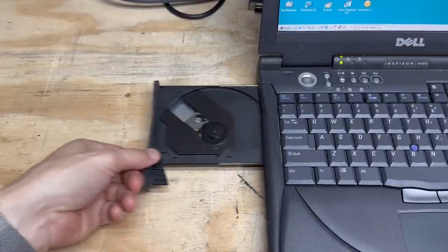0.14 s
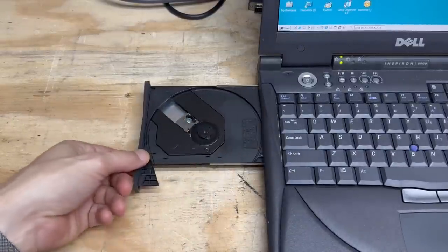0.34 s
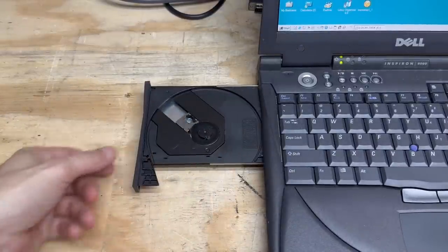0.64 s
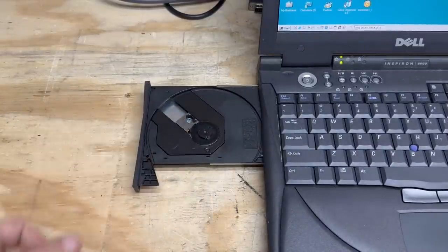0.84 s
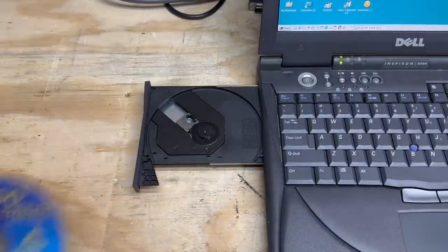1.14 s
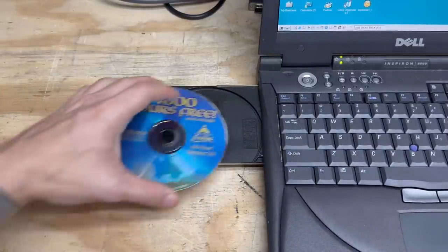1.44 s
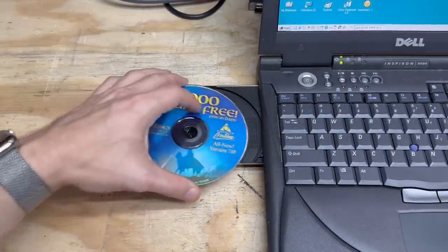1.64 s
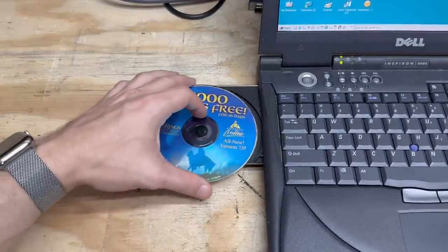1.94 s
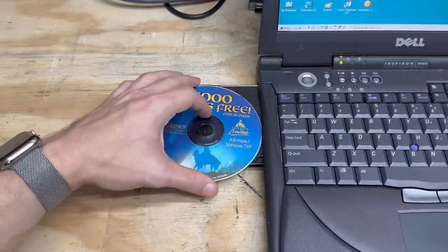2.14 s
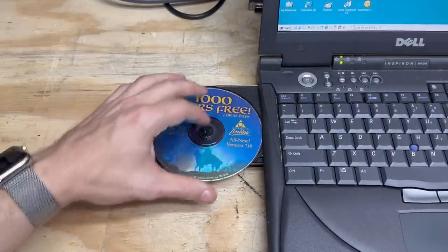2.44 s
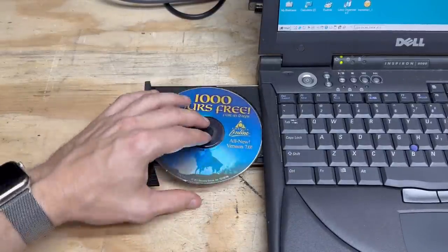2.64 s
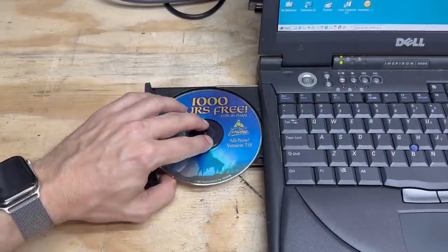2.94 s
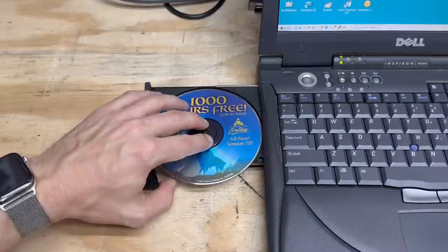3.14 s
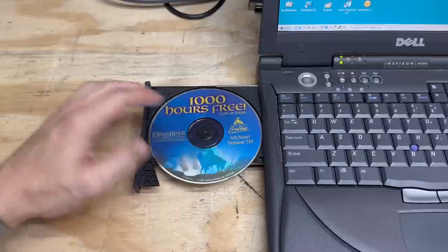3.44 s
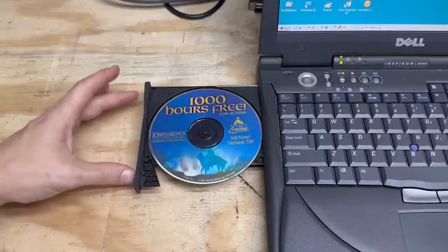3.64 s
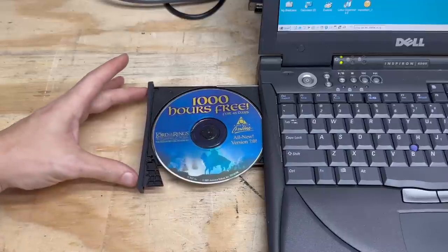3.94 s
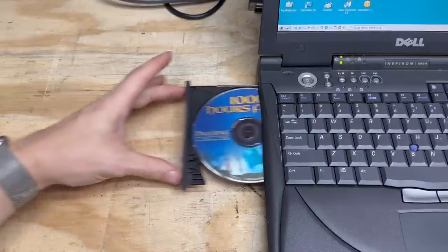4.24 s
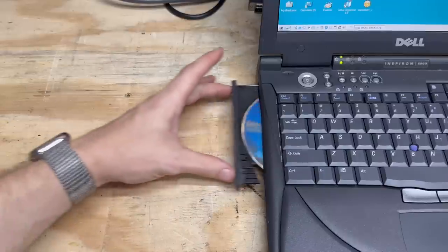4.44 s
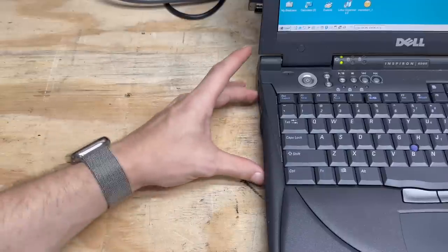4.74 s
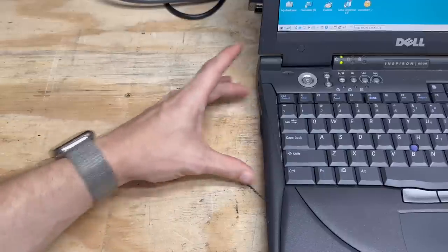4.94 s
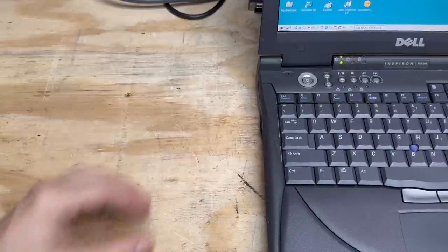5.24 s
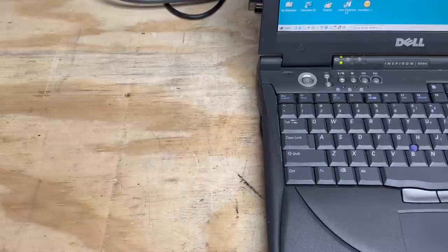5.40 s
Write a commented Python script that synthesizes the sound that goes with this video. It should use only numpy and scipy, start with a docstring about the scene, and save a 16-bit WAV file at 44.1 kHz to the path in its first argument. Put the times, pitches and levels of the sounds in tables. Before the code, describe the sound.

Close to the microphone in a small room, a laptop disc tray scrapes out and clacks against its stop. After soft handling thumps, a loose disc ticks lightly on the hub, then snaps down hard with a short ring. A pause follows, then the tray slides in with a rising hiss, knocks and latches over a faint fan hum.

```python
"""A laptop hums with fan and hard-disk tones over moving air, and hand moves swell a low rumble at the close mic.
Hissing rails carry the disc tray out to its stop: blows ring its modes, with soft thumps, rattle and brushing skin.
A whine sets in and settles, light taps ring the loose disc as it is fidgeted onto the hub, and a loud snap
presses it home. Then the tray slides back along its rails and latches. A small room, made of decaying noise,
answers the handling sounds throughout."""
import sys
import numpy as np
from scipy import signal
from scipy.fft import rfft, irfft, next_fast_len
from scipy.io import wavfile

SR = 44100
rng = np.random.default_rng(int(sys.argv[2]) if len(sys.argv) > 2 else 0)


def store_wav(level_fs):
    """Save 16-bit WAV to argv[1]."""
    pcm = np.round(np.clip(np.atleast_2d(level_fs), -1, 1) * 32767)
    wavfile.write(sys.argv[1], SR, pcm.T.astype(np.int16))


N = 245637
T = np.arange(N) / SR


def undb(db):
    """Decibels to gain."""
    return 10 ** (np.asarray(db) / 20)


def unit(x):
    """Scale to rms 1."""
    return x / np.sqrt(np.mean(x ** 2) + 1e-20)


def lookup(points, hz):
    """Read (f/Hz, value) points on a log-frequency axis."""
    f, value = np.transpose(points)
    return np.interp(np.log(np.maximum(hz, 1)), np.log(f), value)


def colour(x, points):
    """Filter by a (f/Hz, level/dB) spectrum."""
    size = next_fast_len(len(x))
    gain = undb(lookup(points, np.fft.rfftfreq(size, 1 / SR)))
    return irfft(rfft(x, size) * gain, size)[:len(x)]


def band(x, lo_hz, hi_hz, order=2):
    """Causal band-pass."""
    sos = signal.butter(order, [lo_hz, min(hi_hz, SR / 2 - 1)], "band", fs=SR, output="sos")
    return signal.sosfilt(sos, x)


def fade(t, t60):
    """Exponential decay, down 60 dB after t60 seconds."""
    return np.exp(-np.log(1000) * t / t60)


def walk(rate):
    """Random drift with a spread near 1, taking a new direction rate times a second."""
    knots = rng.standard_normal(32768)
    return np.interp(T * rate, np.arange(len(knots)), knots)


def gate(start, end, attack, release):
    """Level 1 from start to end, with an exponential rise before and fall after."""
    return np.exp(np.minimum(T - start, 0) / attack - np.maximum(T - end, 0) / release)


def swell(s, length):
    """A bell-shaped rise and fall around a time."""
    return np.exp(-(2 * (T - s) / length) ** 2)


def add(track, s, sound):
    """Mix a sound in at a time."""
    start = max(int(s * SR), 0)
    track[start:start + len(sound)] += sound[:N - start]


def wash(t, spectrum, t60s, ring=1):
    """Countless overlapping modes: noise whose half-octave bands each die at their own rate."""
    hz = np.fft.rfftfreq(len(t), 1 / SR)
    noise = rfft(rng.standard_normal(len(t))) * undb(lookup(spectrum, hz))
    out = 0
    for centre in 125 * 2 ** (np.arange(15) / 2):
        share = np.maximum(1 - 2 * abs(np.log2((hz + 1) / centre)), 0)  # neighbours crossfade
        out = out + irfft(noise * share, len(t)) * fade(t, ring * lookup(t60s, centre))
    return out


def tone(hz):
    """A tone that wavers slightly in pitch and level."""
    phase = 2 * np.pi * np.cumsum(hz + 0.63 * walk(15)) / SR
    return unit(np.sin(phase)) * undb(1.3 * walk(3))


def laptop():
    """Fan and hard-disk tones, and for a while a whine, over the coloured noise of moving air."""
    # fan and hard-disk tones: (f/Hz, level/dB)
    hum = [(58, -56), (290.7, -66.5), (930, -79.5), (1696, -81), (1814, -85), (2525, -78), (2745, -85),
           (3052, -87.5), (5416, -87.5)]
    # spectrum of the moving air: (f/Hz, relative level/dB per Hz)
    air = [(60, 16.5), (150, 8.5), (330, -1.5), (600, -8), (930, -3), (1300, -5.5), (1800, -7.5),
           (2200, -8.5), (2700, -6), (3400, -16.5), (5500, -15.5), (8000, -19), (12000, -21.5),
           (16000, -29)]
    tones = sum(undb(db) * tone(hz) for hz, db in hum) + whine()
    air_level = undb(-62.5 + .5 * walk(1.8))
    return tones + air_level * unit(colour(rng.standard_normal(N), air))


def rumble():
    """Each move of the hand swells a deep rumble and a soft, uneven rustle at the microphone."""
    # hand moves: (t/s, length/s, rumble level/dB before trim, rustle level/dB re that, before trim)
    moves = [(0.566, 0.14, -40, -24), (0.615, 0.14, -30, -46), (0.776, 0.12, -44, -19),
             (0.995, 0.25, -40.5, -20.5), (1.193, 0.24, -37.5, -51), (1.351, 0.19, -41, -21),
             (1.9, 0.6, -59, -9), (2.65, 0.16, -47, -19.5), (3.056, 0.19, -55.5, -27.5),
             (3.793, 0.37, -57.5, -8.5), (4.298, 0.63, -51, -37), (4.798, 0.27, -31.5, -42),
             (5.007, 1, -50.5, -20.5), (5.538, 0.13, -43, -25)]
    # rumble spectrum: (f/Hz, relative level/dB per Hz)
    rumble_shape = [(3, 20), (12, 17), (20, 2.5), (30, -0.5), (45, -15.5), (80, -16.5), (130, -37.5),
                    (300, -46.5), (1000, -78.5)]
    # rustle spectrum: (f/Hz, relative level/dB per Hz)
    rustle_shape = [(50, -2), (120, -1), (200, -4), (350, -11), (600, -16.5), (1500, -27.5), (4000, -44.5)]
    # a constant floor lies under the moves
    deep_level = undb(-49.5) + sum(undb(db) * swell(s, length) for s, length, db, _ in moves)
    rustle_level = undb(-72.5) + sum(undb(db + rel) * swell(s, length) for s, length, db, rel in moves)
    deep = colour(rng.standard_normal(N), rumble_shape)
    audible = band(deep, 20, 120, order=4)  # the rumble's level is set by this band alone
    rustle = unit(colour(rng.standard_normal(N), rustle_shape)) * undb(3 * walk(22))
    rumble_trim_db, rustle_trim_db = -3.5, 7.0
    deep = undb(rumble_trim_db) * deep_level * deep / np.std(audible)
    return deep + undb(rustle_trim_db) * rustle_level * rustle


def strokes():
    """Friction level of the rails: each stroke sets in, gains or loses speed steadily and dies away."""
    # strokes of the tray: (start t/s, end t/s, level/dB at the start before trim, slope/dB per s)
    stroke_table = [(-.03, 0.25, -47, -41), (4.079, 4.302, -54.5, 62.5), (4.364, 4.395, -58.5, 0),
                    (4.44, 4.584, -59.5, 34)]
    attack_s, release_s = 0.022, 0.036
    return sum(undb(db + slope * (np.clip(T, start, end) - start)) * gate(start, end, attack_s, release_s)
               for start, end, db, slope in stroke_table)


def ticks(level, rate, lo_hz, hi_hz, cycles, spread_db):
    """Tiny random contacts under a level curve, each a click with a short ring of its own pitch."""
    out, t = np.zeros(N), np.arange(1024) / SR
    chance = rng.uniform(size=(int(rate * N / SR), 3))
    for when, pitch, size in chance:
        hz = lo_hz * (hi_hz / lo_hz) ** pitch
        tick = np.sin(2 * np.pi * hz * t) * fade(t, cycles / hz) + (t == 0)
        boost = undb(-spread_db * np.log(1 - .97 * size))  # many small contacts, a few strong ones
        add(out, when * N / SR, level[int(when * N)] * boost * tick)
    return out


def sliding():
    """Tiny catches along the rails hiss and ring the tray in step with its speed, with a squeak now and then."""
    # hiss of the rails: (f/Hz, relative level/dB per Hz)
    rails = [(200, -21), (700, -5.5), (1400, -2.5), (2000, -3), (3000, -2.5), (5000, -4.5), (7000, -10.5),
             (9800, -8), (12000, -12), (15500, -9)]
    # tray resonances that the rails excite: (f/Hz, typical level/dB re hiss)
    scrape_rings = [(1330, -25), (2300, -51), (3070, -19), (4500, -45)]
    # brief squeaks: (t/s, length/s, f/Hz at t, width/Hz of random modulation, level/dB, glide/Hz per s)
    squeaks = [(0.164, 0.041, 9900, 4000, -56.5, 0), (0.173, 0.07, 5200, 995, -62, 22000),
               (4.121, 0.02, 4800, 600, -52.5, 9000), (4.21, 0.048, 4630, 2000, -54, -10000),
               (4.208, .035, 2320, 600, -57, 1), (4.256, 0.075, 3010, 160, -53, -1000),
               (4.304, 0.049, 1364, 160, -55, -3)]
    stick_slip = undb(6 * rng.uniform(-1, 1, N) + 1.8 * walk(45) + 2.4 * walk(220))
    catches = rng.standard_normal(N) * stick_slip
    scrape = unit(colour(catches, rails))
    for hz, db in scrape_rings:  # each resonance comes and goes as the contact travels
        resonance = unit(band(catches, hz / 1.04, hz * 1.04, order=2))
        scrape = scrape + undb(db + 6.9 * walk(37)) * resonance
    friction = strokes()
    out = undb(-6.5) * scrape * friction  # trim
    # larger single catches, 92 a second, 12 dB under the untrimmed friction level
    out += ticks(undb(-12) * friction, 92, lo_hz=1166, hi_hz=8900, cycles=60, spread_db=4.0)
    for s, length, hz, width, db, glide in squeaks:
        pitch = hz + glide * np.clip(T - s, -length, length)
        carrier = np.exp(2j * np.pi * np.cumsum(pitch) / SR)
        squeak = (walk(width) + 1j * walk(width)) * carrier
        out += undb(db) * swell(s, length) * unit(squeak.real)
    return out


def contacts(hits, pattern):
    """Turn every hit into the quick series of contacts that a loose part makes."""
    return [(s + lag, db + mid, thud + low - mid, crack + high - mid, hz, free)
            for s, db, thud, crack, hz, free in hits for lag, low, mid, high in pattern]


def blows(hits, modes, ring, crowd_db, crack_db, favour_db, top_hz, rise_cycles, scatter):
    """Each blow cracks and rings a part's modes; returns what reaches the microphone and what goes into the room."""
    # the crowd of weaker plastic modes: (f/Hz, relative level/dB per Hz)
    plastic = [(150, -10.5), (450, -3.5), (680, 3.5), (1050, -3.5), (1450, 4), (2300, 2), (3700, -1.5),
               (5500, -4.5), (7000, -7), (10000, 0), (15500, -2)]
    # decay of that crowd, before the ring factor: (f/Hz, t60/s)
    plastic_t60 = [(200, 0.057), (1400, 0.042), (5000, 0.047), (15000, 0.035)]
    near, spread, t = np.zeros(N), np.zeros(N), np.arange(8192) / SR
    attack = slice(SR // 100)  # the first 10 ms set the level
    contact = signal.butter(2, min(top_hz, .45 * SR), fs=SR, output="sos")  # a softer contact is duller
    for s, hit_db, thud_db, crack_rel_db, favoured_hz, free_db in hits:
        levels = hit_db + thud_db, hit_db, hit_db + crack_rel_db
        crack = 1 + undb(crack_db) * fade(t, 0.0037)
        body = undb(crowd_db) * wash(t, plastic, plastic_t60, ring) * crack
        detune = 1 + scatter * rng.standard_normal(len(modes))  # the fingers load the part differently each time
        for k, (hz, db, t60) in enumerate(modes):
            mode = np.sin(2 * np.pi * hz * detune[k] * t) * fade(t, t60 * ring)
            body = body + (-1) ** k * undb(db + free_db) * mode
        # the point of contact favours one resonance
        body = body + undb(favour_db) * band(body, favoured_hz / 1.07, favoured_hz * 1.07, order=1)
        body, click = signal.sosfilt(contact, [body, t == 0])
        for (lo, hi), db in zip([(150, 1200), (1200, 5000), (5000, 20000)], levels):
            # bending waves are slower in the bass, so it builds up later
            part = band(body * (1 - np.exp(-t * hi / rise_cycles)), lo, hi, order=4)
            part = undb(db) * part / np.std(part[attack])
            add(near, s, part)
            # summed over all directions no single mode stands out: the room gets a plain click of the same energy
            add(spread, s, np.std(part) * unit(band(click, lo, hi, order=4)))
    return np.array([near, spread])


def singing(s, clusters, count):
    """Close, lightly damped modes beat against each other as a struck part rings out."""
    out, t = np.zeros(N), np.arange(32768) / SR
    for hz, width, db, t60 in clusters:
        place, phase = rng.uniform(size=(count, 2)).T
        pitches = hz + width * ((np.arange(count) + place) / count - .5)
        modes = np.sin(2 * np.pi * (np.outer(t, pitches) + phase)).sum(axis=1)
        add(out, s, undb(db) * unit(modes) * fade(t, t60) * (1 - np.exp(-t / .005)))
    return out


def tray():
    """The tray knocks on its stop, rails and latch, each hit a double contact; the open tray rings on once."""
    # hits: (t/s, level/dB, bass thud/dB re level, treble crack/dB re level, favoured f/Hz, mode boost/dB),
    # all before the contact pattern
    tray_hits = [(.1970, -39.5, -20, -9, 3730, 9), (.2065, -47.5, 1, -14, 1410, -13),
                 (.2150, -39, -3, -10.5, 2780, 0), (4.3156, -29.5, -8, -6, 1220, 11),
                 (4.3904, -56.5, 4, 2, 5150, 1), (4.4160, -47, -10, -12, 2480, 1),
                 (4.5680, -42.5, -4.5, -0.5, 3470, -6), (4.6205, -54.5, 5.5, -10, 1060, 4),
                 (4.6304, -54.5, -17, -12, 3380, 4), (4.7140, -35, -1, 3, 3700, 6.5),
                 (4.7188, -46.5, 8.5, -9, 1070, 14), (4.7675, -48.5, 5.5, -11, 1240, -6),
                 (4.7760, -58, -6, -6, 1700, -3), (4.8260, -59, 3, -12, 3400, -4),
                 (4.8630, -58.5, -2, -12, 3480, 17)]
    # a bright edge, then its weight seats: (lag/s, bass/dB, middle/dB, treble/dB)
    tray_contacts = [(0, -7, -0.5, -2), (.0038, -3.5, -8, -19)]
    # modes before detuning and ring factor: (f/Hz, relative level/dB, t60/s)
    tray_modes = [(757, 4, 0.069), (860, 17.5, 0.07), (1070, 11.5, 0.041), (1348, 22.5, 0.039),
                  (1520, 15, 0.062), (3100, 28.5, 0.017), (3770, 29, 0.0064), (2480, 11.5, 0.063),
                  (5150, 21.5, 0.029), (7800, -5, .025), (10650, -2, 0.032)]
    # clusters of close modes that sing on: (centre f/Hz, width/Hz, level/dB, t60/s)
    open_tray_ring = [(767, 470, -53, 0.36), (2800, 400, -55, 0.33), (4360, 90, -60, 0.25)]
    sound = blows(contacts(tray_hits, tray_contacts), tray_modes, ring=1.21, crowd_db=40.5, crack_db=-1.5,
                  favour_db=1.5, top_hz=13200, rise_cycles=0.98, scatter=0.021)
    sound[0] += singing(tray_hits[2][0], open_tray_ring, count=5)  # direct sound only
    return sound


def thumps():
    """Dull, heavily damped knocks: a decaying sine with a little noise around its pitch."""
    # soft thumps: (t/s, level/dB, f/Hz, t60/s)
    thump_table = [(0.218, -42, 306, 0.056), (.595, -42, 186, 0.1), (1.033, -33, 141, 0.076),
                   (1.036, -42, 270, 0.04), (1.367, -26.5, 57.6, 0.22), (1.374, -25, 151, 0.038),
                   (2.9, -38.5, 135, 0.16), (2.939, -26.5, 118, 0.13), (2.946, -34.5, 79.3, 0.18),
                   (4.744, -41.5, 165.3, 0.11), (4.766, -40.5, 288, 0.059), (4.822, -45, 200.5, .07),
                   (5.165, -46, 220, 0.06), (5.294, -41, 233, 0.049)]
    out, t = np.zeros(N), np.arange(SR // 3) / SR
    for s, db, hz, t60 in thump_table:
        grit = unit(band(rng.standard_normal(len(t)), hz / 2, 1.6 * hz, order=3))
        knock = np.sin(2 * np.pi * hz * t) + 0.21 * grit
        add(out, s, undb(db) * knock * fade(t, t60) * (1 - np.exp(-t / .003)))
    return out


def rattling():
    """Tray and disc chatter in their play after a slam or snap, as bursts of tiny ringing clicks."""
    # rattles: (start t/s, end t/s, base level/dB)
    rattles = [(0.23, 0.245, -47), (2.96, 2.979, -42.5), (4.742, 4.788, -57)]
    attack_s, release_s = .008, 0.055
    level = sum(undb(db) * gate(start, end, attack_s, release_s) for start, end, db in rattles)
    return ticks(level, 130, lo_hz=730, hi_hz=5000, cycles=16, spread_db=3.5)


def brushing():
    """Fingers rub softly over tray and disc: dull noise under an uneven grip."""
    # skin on plastic: (t/s, length/s, level/dB)
    brushes = [(0.556, 0.14, -63), (1.13, 0.099, -62.5), (1.314, 0.055, -58), (2.098, 0.06, -62),
               (3.67, 0.081, -57.5), (4.053, 0.088, -65.5), (4.694, 0.24, -59), (4.784, 0.16, -52.5)]
    # spectrum of the rubbing: (f/Hz, relative level/dB per Hz)
    skin = [(200, 15.5), (800, 5), (2000, 3), (5000, -5), (9000, -10.5), (15000, -26)]
    pressure = sum(undb(db) * swell(s, length) for s, length, db in brushes)
    grip = undb(2.5 * walk(44))
    return pressure * grip * unit(colour(rng.standard_normal(N), skin))


def whine():
    """A thin tone inside the laptop that starts strong and settles, with a steadier partial below it."""
    start_s, end_s, rise_s, settle_s = 1, 2.9, 0.15, 0.3
    age = np.maximum(T - start_s, 0)
    running = np.clip(np.minimum(age, end_s - T) / rise_s, 0, 1)
    high = undb(-82 + 15.5 * np.exp(-age / settle_s)) * tone(2700)  # settles toward -82 dB
    low = undb(-77.5) * tone(1820)
    return running * (high + low)


def disc():
    """The loose disc touches tray and hub, ringing only when the fingers let it go."""
    # taps: (t/s, level/dB, bass thud/dB re level, treble crack/dB re level, favoured f/Hz, mode boost/dB),
    # all before the contact pattern
    disc_taps = [(1.7419, -56, -9, -5.5, 3850, -5), (1.8522, -51.5, -7, -12, 1650, -16),
                 (2.1157, -54, -0.5, -18, 1450, -33), (2.2675, -51.5, -11, -13, 2934, -1.5),
                 (2.4360, -49, -4.5, -6.5, 3660, -7), (2.4490, -49.5, -7.5, -16, 2934, 8),
                 (2.4640, -60.5, -6, -21, 1502, 5), (2.4980, -53.5, -2, -1.5, 3650, -7),
                 (2.5080, -56.5, -4, -12, 2820, 4), (2.5290, -52, -3.5, -7, 3620, -13),
                 (2.5415, -60.5, -2, -3.5, 1520, -7), (2.5534, -57.5, -0.5, -14, 3700, -23),
                 (2.6974, -65, -6, 4.5, 8900, -6), (2.7240, -59.5, -0.5, -12.5, 1480, -10)]
    # a graze, the tap, a bounce: (lag/s, bass/dB, middle/dB, treble/dB)
    disc_contacts = [(-.007, -17, -23.5, -21), (0, -4, -1.5, -1.5), (.006, -7, -9, -13)]
    # modes of the loose disc before detuning: (f/Hz, relative level/dB, t60/s)
    disc_modes = [(583, -15, 0.044), (1502, 6, 0.064), (1625, -3, 0.083), (2934, 12, 0.071),
                  (3730, 3, 0.042), (3820, -18, 0.079), (4800, -16, .12), (6370, 6, 0.04), (8200, 3.5, .04),
                  (9726, 1, 0.05)]
    return blows(contacts(disc_taps, disc_contacts), disc_modes, ring=1.0, crowd_db=12.0, crack_db=3.5,
                 favour_db=7.5, top_hz=8970, rise_cycles=3.7, scatter=0.014)


def hub():
    """The disc is forced over the hub's spring catches; the clamped disc rings on after the last snap."""
    # snaps: (t/s, level/dB, bass thud/dB re level, treble crack/dB re level, favoured f/Hz, mode boost/dB)
    hub_snaps = [(2.9004, -32.5, -8.5, 5.5, 8300, -15), (2.9155, -49, 1, 2, 12100, -8),
                 (2.9411, -16, -8, 1, 3950, 0), (2.9440, -26.5, -13.5, -5, 3945, -10.5)]
    # modes of the clamped disc before detuning and ring factor: (f/Hz, relative level/dB, t60/s)
    hub_modes = [(337.6, -7, 0.056), (582, -7, 0.08), (642, -2.5, 0.088), (700, -4.5, 0.054),
                 (920, -9, 0.14), (1310, 1, 0.099), (1481, 6, 0.07), (1618, 3, 0.1), (1784, -6, 0.15),
                 (2020, -9.5, 0.2), (3680, 7.5, 0.04), (3760, 9.5, 0.04), (4000, 8.5, 0.039),
                 (5500, 0, 0.06), (6320, -1, 0.094), (9600, 16.5, 0.018), (12600, 9, 0.0073),
                 (14000, 13.5, 0.015)]
    # clusters of close modes that sing on: (centre f/Hz, width/Hz, level/dB, t60/s)
    clamped_disc_ring = [(580, 160, -40.5, 0.42), (1570, 160, -38.5, .42), (1798, 30, -43.5, 0.42),
                         (1850, 280, -39, 0.41), (4020, 220, -43.5, .36), (6400, 560, -42.5, 0.37)]
    sound = blows(hub_snaps, hub_modes, ring=.64, crowd_db=18.0, crack_db=-3.5,
                  favour_db=2.5, top_hz=18440, rise_cycles=5, scatter=0.0062)
    sound[0] += singing(hub_snaps[-1][0], clamped_disc_ring, count=7)  # direct sound only
    return sound


def room(x, wet_db, delay_s):
    """Diffuse answer of a small room, arriving just after the direct sound."""
    # colour of the room: (f/Hz, relative level/dB)
    room_colour = [(100, 0.5), (350, -7.5), (570, 1.5), (800, 1), (1100, -1.5), (1600, 5), (2400, -3.5),
                   (4000, 1), (4800, -4.5), (6300, -2), (15000, -5)]
    # decay of the room: (f/Hz, t60/s)
    room_t60 = [(200, .28), (530, .34), (1500, .42), (3700, .41), (9700, .35), (15000, .25)]
    t = np.arange(32768) / SR
    tail = wash(t, room_colour, room_t60) * np.clip(t / delay_s - 1, 0, 1)
    return undb(wet_db) * signal.fftconvolve(x, tail / np.linalg.norm(tail))[:N]


def scene():
    """Tray, disc and hub in the room, over the hum and rumble."""
    # the soft layers go alike to the microphone and into the room
    near, spread = tray() + disc() + hub() + thumps() + sliding() + rattling() + brushing()
    return (near + room(spread, wet_db=-16.0, delay_s=0.0038) + laptop() + rumble())[None]


def record(dry):
    """Soft saturation rounds the highest peaks and a steep low-pass cuts the top above 16 kHz."""
    rounded = 0.83 * np.tanh(dry / 1.035)
    return signal.sosfilt(signal.ellip(8, .2, 70, 16000, fs=SR, output="sos"), rounded)


dry = scene()
out = record(dry)
store_wav(out)
```